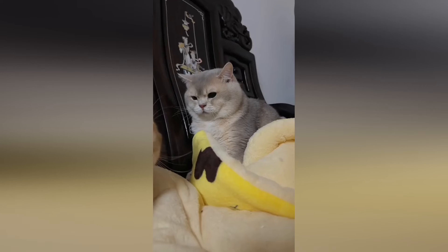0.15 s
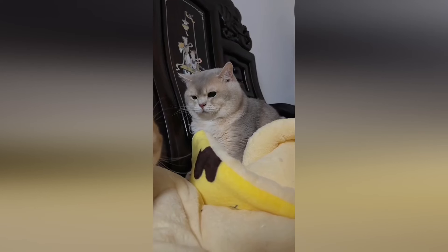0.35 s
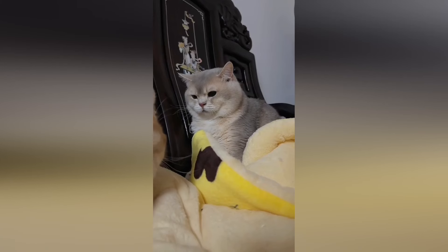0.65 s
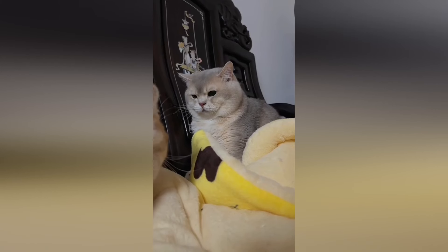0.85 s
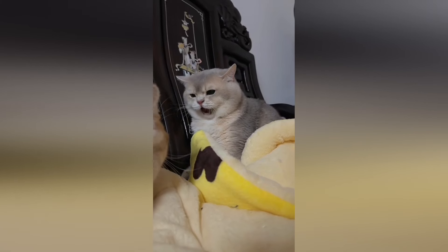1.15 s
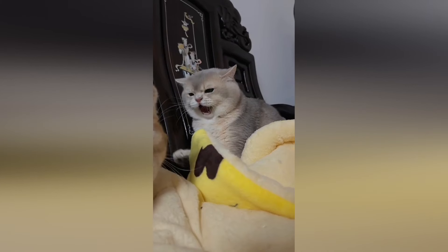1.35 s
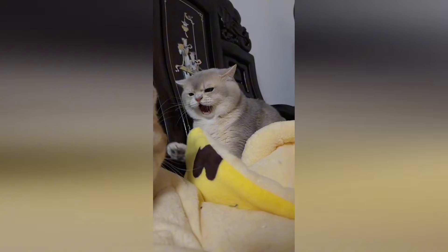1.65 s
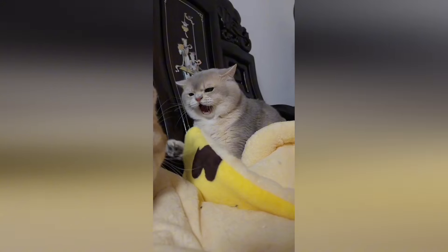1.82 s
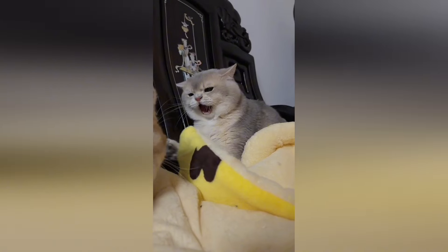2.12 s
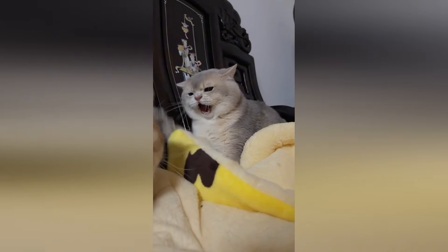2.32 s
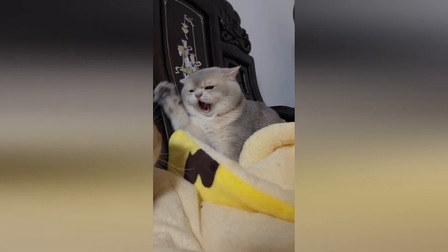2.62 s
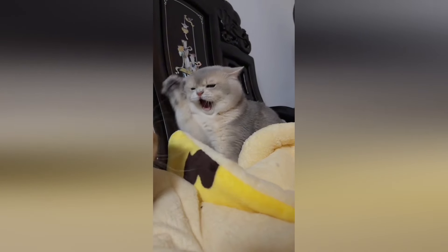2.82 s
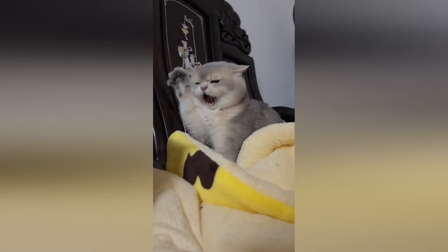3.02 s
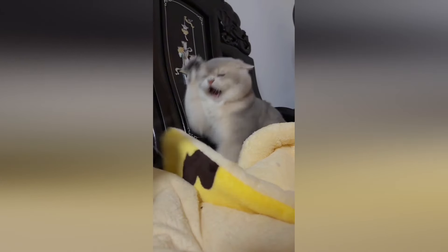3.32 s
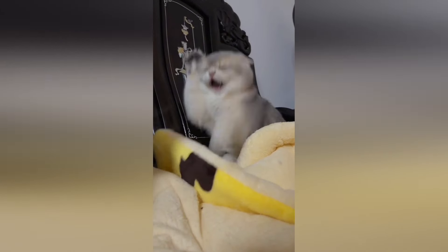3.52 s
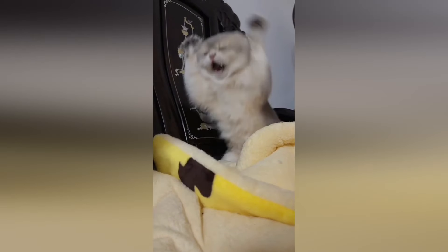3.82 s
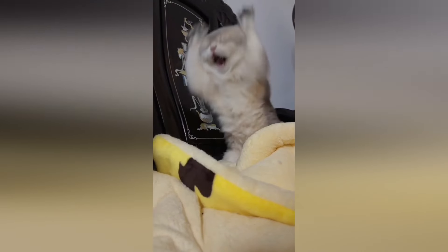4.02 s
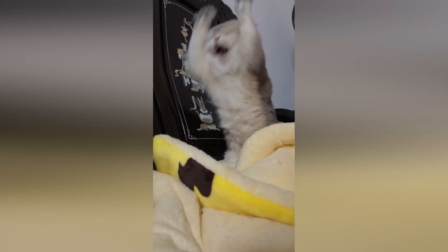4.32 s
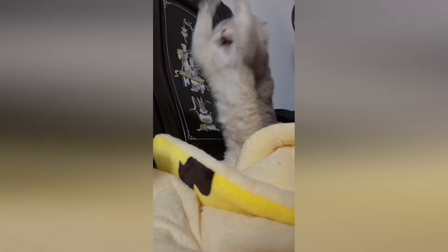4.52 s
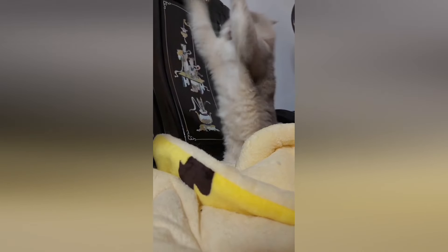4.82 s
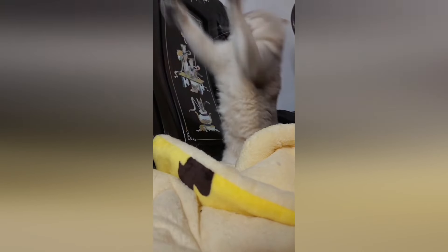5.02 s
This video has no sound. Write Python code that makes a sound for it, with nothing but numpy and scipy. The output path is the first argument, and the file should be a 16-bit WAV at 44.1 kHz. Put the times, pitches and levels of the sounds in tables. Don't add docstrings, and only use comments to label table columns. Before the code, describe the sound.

Close indoor phone capture of a cat humming low, then yowling long and hoarse, with faint whining from another cat and bedding bumps.

```python
import sys
import numpy as np
from scipy import signal
from scipy.fft import rfft, irfft, next_fast_len
from scipy.io import wavfile
from scipy.ndimage import uniform_filter1d

SR = 44100
rng = np.random.default_rng(int(sys.argv[2]) if len(sys.argv) > 2 else 0)


def inscribe(sig):
    pcm = np.round(np.clip(np.atleast_2d(sig).T, -1, 1) * 32767)
    wavfile.write(sys.argv[1], SR, pcm.astype(np.int16))


def level_to_linear(level):
    exponent = np.asarray(level, float) / 20
    return 10 ** exponent


N = 227195
T = np.arange(N) / SR
OPPOSITE = np.array([[1], [-1]])

# t/s, f/Hz
PITCH = [
    [(0.0, 375.4), (0.09, 388.7), (0.2, 348.6), (0.45, 300.5), (0.52, 313.3), (0.6, 270.8), (0.82, 223.9),
     (0.97, 228.8), (1.06, 289.8), (1.1, 312.8), (1.14, 338.7)],
    [(1.14, 384.4), (1.17, 441), (1.21, 465.2), (1.25, 502.4), (1.28, 519.7), (1.5, 530.6), (1.75, 506.9),
     (1.8, 505.7), (1.84, 495.4), (1.864, 501.6), (1.876, 516), (1.976, 522.2), (2.03, 523.3), (2.2, 537.8),
     (2.33, 548), (2.36, 562.3), (2.47, 574), (2.55, 593.4), (2.63, 616.5), (2.67, 619), (2.7, 642),
     (2.82, 661.8), (2.97, 650.5)],
    [(2.91, 739), (2.93, 754), (3.0, 768.2), (3.16, 788.5), (3.27, 779), (3.36, 778), (3.43, 712.6)],
    [(3.4, 749.8), (3.44, 701), (3.57, 681.8), (3.63, 810.5)],
    [(3.55, 705.4), (3.62, 790.6), (3.81, 787.6), (4.06, 791), (4.14, 823.4), (4.32, 800.6), (4.5, 791.2),
     (4.68, 824), (4.76, 724)],
    [(4.72, 514.3), (4.76, 497.7), (4.82, 500.2), (4.85, 484.5), (4.91, 470.7), (4.96, 486.7),
     (5.07, 489.4), (5.1, 470), (5.15, 452)],
]
# t/s, level/dB
EFFORT = [(0.0, -28), (0.17, -21.5), (0.62, -21.5), (0.72, -29.5), (0.87, -20), (1.26, -25.5), (1.3, -19.5),
          (1.95, -22.5), (2.54, -20.5), (4.37, -20), (4.47, -15), (4.63, -21), (4.68, -19), (4.75, -24.5),
          (4.85, -20.5), (5.02, -22.5), (5.12, -21), (5.15, -27.5)]
# t/s, jaw (0 shut, 1 open, 2 gaping, 3 half shut), pitch jitter/%, hoarseness (0-1)
FOLDS = [(0, 0, 0.19, 0.09), (1.025, 0, 0.97, 0), (1.04, 0.42, 0.6, 0.58), (1.13, 0.75, 0.781, 0.38),
         (1.19, 0.84, .5, 0.4), (1.3, 1, 0.64, 0.51), (2.8, 1.5, 0.56, 0.39), (2.94, 1.43, 1.21, 0.15),
         (3.05, 2, 0.3, 0.42), (3.33, 2, 0.42, 0.2), (3.42, 2.5, 0.81, 1.12), (3.58, 2.5, 0.73, 0),
         (3.68, 2.5, 0.34, 0.02), (3.95, 2.5, 0.37, 0.01), (4.25, 2.5, 0.47, 0.72), (4.44, 2.5, 0.6, 0.7),
         (4.52, 3, 0.61, 1.16), (4.7, 3, 1.27, 0.16), (4.85, 3, 0.49, 0.98), (5.15, 2.5, 0.71, 0.98)]
# start t/s, end t/s, cycles, level/dB
UNEVEN = [
    (3.442, 3.9, 2, -26),
    (4.07, 4.159, 3, -23),
    (4.2, 4.287, 3, -2.5),
    (4.32, 4.38, 3, -12.5),
    (4.7, 4.727, 2, -12.5),
    (4.648, 4.73, 3, -6),
]
UNEVEN_FADE_DB_S, UNEVEN_WAVER_DB = 99, 3
UPPER_SIDE_DB = -4.5
# centre t/s, half length/s, rate f/Hz, pitch swing/%, level/dB
FLUTTER = [(1.463, 0.041, 53.7, 1.6, 0.5), (1.849, .07, 59.9, 2.3, -1), (2.334, 0.083, 54.9, 1.2, 0.5),
           (2.551, 0.058, 60.7, 1.35, 1), (2.702, 0.051, 43.6, 1.9, 0), (3.428, 0.029, 91.5, 3.1, 0.5),
           (4.076, .06, 49, 1.76, -0.5), (4.576, 0.1, 48.4, 1.53, 2.5), (4.846, 0.02, 50, 1.1, -0.5),
           (5.004, 0.077, 70.8, 1.9, 0), (5.117, 0.023, 74, 1.6, -0.5)]
# t/s, length/s, level/dB
SURGES = [(0.077, 0.016, -7), (0.482, 0.015, -2), (0.776, 0.038, -1), (1.097, 0.057, -1),
          (1.322, 0.022, 3.5), (1.359, 0.028, -4), (1.397, 0.017, 2), (1.432, 0.013, -5), (1.47, 0.008, 2),
          (1.5, 0.038, -3.5), (1.637, 0.05, 2), (1.737, 0.043, 3.5), (2.11, 0.042, 2.5),
          (2.177, 0.031, -1.5), (2.598, 0.012, 2.5), (2.642, 0.0083, 2), (2.692, 0.017, -3),
          (2.708, .008, 0), (2.8, 0.023, -7), (2.832, 0.032, 4.5), (2.903, 0.018, 3.5),
          (3.007, 0.017, -2.5), (3.05, 0.026, 2.5), (3.089, 0.022, -5), (3.121, 0.02, 1),
          (3.139, 0.0055, -3.5), (3.215, 0.0064, 2), (3.22, 0.012, 1), (3.245, 0.013, -2.5),
          (3.285, 0.053, 3.5), (3.371, 0.0076, 8.5), (3.419, 0.0074, 6), (3.43, .006, -1.5),
          (3.657, 0.017, -3), (3.762, 0.048, -2), (3.822, 0.019, 1.5), (4.018, 0.02, -3),
          (4.154, 0.019, -0.5), (4.419, 0.0065, -6.5), (4.516, 0.0087, 5.5), (4.525, 0.012, -4),
          (4.669, 0.012, -0.5), (4.822, 0.012, -1.5), (4.831, 0.0089, -0.5), (4.855, 0.007, -1.5),
          (4.913, .012, 2.5), (4.939, 0.0094, -5), (4.955, 0.049, 2)]
# t/s, level/dB
WHEEZE = [(1.0, -0.5), (1.2, 4), (1.3, -3), (2.2, -3), (2.95, -4), (3.3, -5.5), (3.6, 1), (3.9, -3),
          (4.15, 3), (4.5, 1), (5.15, -1)]
BREATH_DB, GROWL_DB, WHEEZE_DB = (-58, -22), (-33.5, -12.5), (-6.5, -3)
GROWL_HZ, TREMOR_DB = 117.5, 1.5
BREAK_S = .03

# f/Hz, then level/dB with the jaw shut, open, gaping, half shut
TRACT = [(120, -45, -45, -37.5, -43), (210, -6, -7, -42.5, -72), (520, -1, -7, -27, 6.5),
         (701, 3, -22, -31.5, -17.5), (1045, -31, 4, -7, -14), (1290, -53, -13.5, -11.5, -5),
         (2457, -42, 4.5, 8, -3), (2554, -53, 7, -18.5, -6), (3055, -59.5, -21, -9.5, -3),
         (3690, -48.5, -21, -24, -27.5), (4050, -66.5, -18.5, -41.5, -26), (7530, -44, -49.5, -40, -38.5),
         (10970, -53, -29, -48, -18.5), (14400, -64, -47, -55, -37.5)]
# t/s, centre f/Hz, lift level/dB
TEETH = [(1.05, 4180, 8), (2.0, 4950, 2), (2.78, 5130, 13.5), (3.1, 4710, -8), (3.36, 5240, 24),
         (3.55, 5680, 18), (3.8, 5990, 12), (4.1, 5930, 19), (4.3, 5680, 16), (4.44, 5680, 27),
         (4.6, 5510, 32), (4.7, 5400, 18), (5.15, 5200, 17)]
# t/s, centre f/Hz, lift level/dB
PALATE = [(1.05, 2566, -6), (1.2, 2615, -15), (1.45, 2710, -11), (1.7, 2550, 5.5), (1.95, 2530, 9),
          (2.15, 2594, 16.5), (2.3, 2680, 3), (2.55, 2970, 0.5), (2.8, 3130, -6.5), (3.1, 3200, -5),
          (3.35, 3050, 10), (3.45, 2860, 15), (3.57, 2680, 13.5), (3.65, 3170, 4), (4.05, 3370, 2),
          (4.3, 3240, 9.5), (4.5, 2920, -11), (4.8, 3000, 2), (5.15, 2850, 13.5)]
# t/s, centre f/Hz, level/dB
POCKET = [(0.9, 4620, -7), (1.08, 4800, -23), (1.17, 4850, -22), (1.25, 4900, -3), (1.5, 4900, -3.5),
          (3.25, 4500, 3), (3.35, 4350, -8), (3.48, 4150, -14), (3.54, 4000, -2), (3.9, 4170, 10),
          (4.15, 4510, -11), (4.33, 4330, -3), (4.42, 3680, -6), (4.8, 3700, -7), (5.15, 3600, -9)]
# t/s, low f/Hz,
# high f/Hz, lift level/dB
OPENING = [(1.0, 754, 2330, -14), (1.05, 860, 2300, -2.5), (1.12, 1300, 2590, 27), (1.17, 1425, 2740, 17.5),
           (1.21, 1417, 1850, 7.5), (1.28, 1640, 2100, 14), (1.36, 1590, 2030, 6)]
TEETH_WIDTH_HZ, PALATE_WIDTH_HZ, POCKET_WIDTH_HZ, OPENING_WIDTH_HZ = 317, 150, 150, 224
# centre f/Hz, width f/Hz, level/dB
NOTCHES = [(1780, 300, -2.5), (2840, 57, -1.5), (3124, 88, 4.5), (3616, 71, -10.5), (6640, 160, -9.5),
           (7220, 55, 3), (7840, 66, -5), (11380, 1900, -16)]
EDGES_HZ = [60, 900, 1800, 3500, 6500, 15800]
# jaw, then level/dB of chest, throat, mouth, teeth, lips
SHARES = [(0, -1.5, -31.5, -43, -48, -58.5), (.6, 7.5, -4, -8.5, -28.5, -36),
          (1, -13.5, -4.5, 0.5, -27.5, -36), (1.5, -15, -11.5, 2, -20, -30.5),
          (2, -11.5, -16, 0.5, -24.5, -30), (2.5, -10.5, -9.5, -2, -19.5, -25.5),
          (3, -5.5, -2.5, -13, -22, -18.5)]
HOARSE_SHIFT_DB = [-11, 1, 2, 3, -5.5]
DRIFT_DB = [1.73, 2.5, 1, 1.2, 0.9]
# t/s, then level/dB of chest, throat, mouth, lips, left minus right
BALANCE = [(0, 0, 2.5, -4, 1, 7), (1.0, -2, -2, 4, -6, 0), (1.12, -3, 2, -4, 2.5, 0),
           (1.24, 2.5, 4, -5.5, 0.5, 1.5), (1.5, 8, -2.5, 0.5, 0, 3), (1.75, -2.5, 0.5, -1, 1, -1.5),
           (2.0, 2, -1.5, -2, 0, 2.5), (2.3, -2.5, 2, 1, -1, 2), (2.5, 7, 6, -0.5, -2.5, 2),
           (2.6, -3.5, 0, 0, -0.5, 2), (2.7, 3, -5.5, -2.5, 0.5, 0.5), (2.95, 0.5, -3, 1, -0.5, 2.5),
           (3.08, -1, 7.5, 1, -0.5, 3.5), (3.2, 4, -5.5, 0.5, -1, 2), (3.4, -1.5, -1.5, -2, -1.5, 2.5),
           (3.55, -8, -6, 0, -4.5, 2), (3.75, -1.5, 2, 4.5, 5.5, -1), (4.0, 2.5, 0.5, 0, -1, 0),
           (4.22, 4, 1, -2.5, 1.5, 3), (4.33, 1.5, -0.5, -3, 3, 3), (4.48, -20, -0.5, 0, -3.5, -2),
           (4.55, -6, -0.5, 0, -6, 1), (4.67, -3.5, 0.5, -1.5, -1.5, 2), (4.8, -12.5, 4.5, -0.5, 3, -1),
           (5.0, -0.5, -1, -6.5, 2.5, 1), (5.15, 3.5, 4, -2, 5, 1)]
PATCHY_DB, LOPSIDED_DB = 4.5, 4.5
# t/s, length/s, centre f/Hz, width f/Hz, level/dB
LIFTS = [
    (1.05, .045, 6130, 548, 7),
    (2.57, 0.075, 9700, 1000, 14),
    (3.78, 0.12, 8030, 900, 9),
    (3.7, 0.076, 7200, 500, 6),
    (4.95, 0.086, 6400, 410, 0),
    (3.21, .2, 1180, 200, 11.5),
    (4.44, 0.09, 4270, 870, 6.5),
    (3.15, 0.18, 11000, 1300, 7),
    (1.35, 0.11, 7000, 900, 4.5),
]

# t/s, f/Hz, level/dB
WHINES = [
    [(0.0, 522, -47.5), (0.052, 527.7, -51.5), (0.156, 515.2, -49), (0.394, 507.7, -46.5),
     (0.402, 534, -46), (0.434, 507, -92), (0.44, 498, -76)],
    [(0.44, 417, -64), (0.444, 395, -50), (0.518, 428, -45), (0.674, 422.4, -47.5), (0.774, 392, -78),
     (0.8, 392.3, -66)],
]
# multiple of the pitch, level/dB
WHINE_ORDERS = [(1, -12), (2, -16.5), (3, -9.5), (4, -17), (5, -21), (6, -21.5)]
ROOM_T60_S, ROOM_TREBLE_T60_S, ROOM_DB = .35, .4, -5

# f/Hz, level/dB
HISS = [(530, -7.5), (900, 0), (1320, -11), (3500, -16.5), (4390, -21), (8860, -19.5), (11100, -29.5),
        (11900, -35), (15500, -43.5)]
HISS_DB = -67
# t/s, length/s, thud level/dB, rustle level/dB
HANDLING = [(0.01, 0.11, -62, -51), (0.48, 1, -50, -54), (1.089, 0.58, -48, -50), (1.422, 0.16, -46.5, -72),
            (2.014, 0.16, -61, -47.5), (2.14, 0.28, -38.5, -54), (2.553, 0.73, -48.5, -56),
            (2.828, 0.79, -51, -56), (3.15, 0.75, -59, -59.5), (3.377, 0.37, -42.5, -61),
            (3.537, 0.47, -44, -54), (3.796, 0.29, -48, -42.5), (4.186, 0.51, -53, -41),
            (4.393, 0.42, -51, -32), (4.8, 0.39, -60, -33.5), (5.04, 1, -47, -42)]
BUMP_FALL_DB = 35.5
STILL_THUD_DB, STILL_RUSTLE_DB = -65.5, -72
# t/s, length/s, level/dB
SHOVES = [
    (.2, .3, -59),
    (0.604, .2, -65),
    (2.137, 0.072, -42),
    (2.3, 0.056, -55),
    (3.0, 0.12, -67),
    (3.4, .1, -50),
    (3.607, 0.15, -50.5),
    (3.848, 0.092, -67),
]

# f/Hz, level/dB
MASK_DB = [(0, -45), (1200, -43), (2500, -30.5), (3800, -19), (5800, -10), (7200, -4), (16000, -3)]
# f/Hz, level/dB
COVER_DB = [(200, -67), (600, -59), (800, -60.5), (1300, -54.5), (1800, -62), (4000, -58), (6500, -62.5),
            (9000, -64.5), (12000, -68.5), (16000, -69.5)]
COVER_HZ, MUTE_DB = (900, 3500), -40
WIDE_TOP_HZ, WIDE_UNDER_DB = 6200, -58
# t/s, fall/ms, hold/ms, rise/ms, depth level/dB
DROPOUTS = [
    (1.2886, 0.5, 0.82, 13, -15),
    (3.386, 15, 12, 2.5, -4.5),
    (3.795, 5.5, 2.6, 3.3, -16.5),
]
DROPOUT_TOP_HZ = 3800
LIMIT = 2.5


def columns(table, t=T):
    s, *rest = np.transpose(table)
    return [np.interp(t, s, c) for c in rest]


def level(x, db):
    return x * level_to_linear(db) / np.sqrt(np.mean(x ** 2))


def band(x, lo_hz, hi_hz):
    return signal.sosfilt(signal.butter(3, [lo_hz, hi_hz], "bandpass", fs=SR, output="sos"), x)


def walk(rate_hz):
    smooth = signal.butter(2, rate_hz, fs=SR, output="sos")
    return level(signal.sosfilt(smooth, rng.standard_normal(N)), 0)


def flutter():
    pitch_shake, shake_db = 0, 0
    for s, length, hz, pitch, db in FLUTTER:
        swell = np.exp(-((T - s) / length) ** 4)
        turn = 2 * np.pi * hz * (T - s)
        pitch_shake = pitch_shake + pitch / 100 * swell * np.sin(turn)
        shake_db = shake_db + db * swell * np.cos(turn)
    return pitch_shake, shake_db


def turbulence(breath_db, wheeze_db):
    noise = rng.standard_normal(N)
    breath = level_to_linear(breath_db) * (.15 * noise + .85 * band(noise, 1400, 3300))
    at_teeth = level_to_linear(columns(WHEEZE)[0]) * band(noise, 3200, 6500)
    return breath + at_teeth + level_to_linear(wheeze_db) * 1.5 * band(noise, 6500, 17000)


def uneven_strength(cycles):
    strength = 0
    for start, end, every, db in UNEVEN:
        if round(every) == cycles:
            outside_s = np.maximum(np.maximum(start - T, T - end), 0)
            strength = strength + level_to_linear(db - UNEVEN_FADE_DB_S * outside_s)
    return strength


def folds(shake):
    _, jitter, hoarse = columns(FOLDS)
    breath_db, growl_db, wheeze_db = (clear + (rough - clear) * hoarse
                                      for clear, rough in (BREATH_DB, GROWL_DB, WHEEZE_DB))
    wobble = 1 + jitter / 100 * (.8 * walk(15) + .95 * walk(50) + .45 * walk(200)) + shake
    growl = np.cos(2 * np.pi * np.cumsum(GROWL_HZ * (1 + 0.1187 * walk(11.2))) / SR)
    noise = turbulence(breath_db, wheeze_db)
    spells = [(cycles, uneven_strength(cycles)) for cycles in (2, 3)]
    slip, waver = .5 * walk(25), level_to_linear(UNEVEN_WAVER_DB * walk(18))
    out = np.zeros(N)
    for rows in PITCH:
        start, end = rows[0][0], rows[-1][0]
        on = slice(max(int((start - BREAK_S) * SR), 0), int((end + BREAK_S) * SR))
        t = T[on]
        hz = columns(rows, t)[0] * wobble[on]
        phase = 2 * np.pi * np.cumsum(hz) / SR
        partials = range(1, min(31, int(16500 / hz.min()) + 1))
        pulses = sum(np.cos(k * phase + .15 * k * k) * np.clip((16500 - k * hz) / 500, 0, 1)
                     for k in partials)
        turns = sum(g[on] * waver[on] * np.exp(1j * (phase / n + slip[on])) for n, g in spells)
        uneven = turns.conj() + level_to_linear(UPPER_SIDE_DB) * turns + 2 * level_to_linear(growl_db[on]) * growl[on]
        spinning = signal.hilbert(pulses, next_fast_len(len(t)))[:len(t)]
        rough = band((spinning * uneven).real, 1200, 6500)
        breath = noise[on] * (1 + .5 * np.cos(phase)) * np.sqrt(SR / 4 / hz)
        since_start = t - start + (start == 0)
        until_end = end - t + (t[-1] == T[-1])
        fade = np.clip(.5 + np.minimum(since_start, until_end) / BREAK_S / 2, 0, 1)
        out[on] += fade * (pulses + rough + breath)
    return out * level_to_linear(TREMOR_DB * walk(12.9) + 0.9 * jitter * walk(46))


def room(x, wet_db, direct_db=0):
    t = T[:SR // 3]
    shared, noise = rng.standard_normal((2, len(t)))
    differing = 0.5 * band(noise, 710, 1860) + 0.5 * band(noise, 2670, 11000) + 0.89 * noise
    echoes = shared + differing * OPPOSITE
    echoes = echoes - .6 * band(echoes, 60, 800)
    low = signal.lfilter([.3], [1, -.7], echoes)
    treble = (echoes - low) * 0.026
    tail = low * level_to_linear(-60 * t / ROOM_T60_S) + treble * level_to_linear(-60 * t / ROOM_TREBLE_T60_S)
    tail = tail * np.clip(t / 0.0023 - 1, 0, 1)
    tail = tail * level_to_linear(wet_db) / np.sqrt(np.sum(tail ** 2) / 2)
    wet = signal.fftconvolve(x[None], tail, axes=1)[:, :N]
    return (level_to_linear(direct_db) * x + wet) / np.hypot(level_to_linear(direct_db), level_to_linear(wet_db))


def resonance(f, hz, width_hz, db):
    return db / (1 + ((f[:, None] - hz) / width_hz) ** 2)


def tract(f, t, jaw):
    shapes = columns([(np.log(hz), *db) for hz, *db in TRACT], np.log(f + 1))
    tract_db = sum(db[:, None] * np.clip(1 - abs(jaw - k), 0, 1) for k, db in enumerate(shapes))
    for table, width_hz in ((TEETH, TEETH_WIDTH_HZ), (PALATE, PALATE_WIDTH_HZ), (POCKET, POCKET_WIDTH_HZ)):
        hz, db = columns(table, t)
        tract_db = tract_db + resonance(f, hz, width_hz, db)
    for hz, width_hz, db in NOTCHES:
        tract_db = tract_db + resonance(f, hz, width_hz, db)
    low_hz, high_hz, mouth_db = columns(OPENING, t)
    for hz in (low_hz, high_hz):
        tract_db = tract_db + resonance(f, hz, OPENING_WIDTH_HZ, mouth_db)
    return tract_db


def treble_patches(f, shape):
    patches = rng.standard_normal(shape)
    for _ in range(2):
        patches = uniform_filter1d(uniform_filter1d(patches, size=4, axis=1), size=44, axis=2)
    both, lopsided = patches / patches.std() * np.clip(f[:, None] / 3000 - 1, 0, 1)
    return PATCHY_DB * both + LOPSIDED_DB * lopsided * OPPOSITE[..., None]


def cat():
    shake, shake_db = flutter()
    f, t, z = signal.stft(room(folds(shake), ROOM_DB), SR, nperseg=1024, noverlap=896)
    jaw, _, hoarse = columns(FOLDS, t)
    z = z * level_to_linear(tract(f, t, jaw) + treble_patches(f, z.shape))
    chest_db, throat_db, mouth_db, lips_db, pan_db = columns(BALANCE, t)
    z = z * level_to_linear(np.array([pan_db, -pan_db])[:, None] / 2)

    effort_db = columns(EFFORT, t)[0]
    for s, length, db in SURGES:
        effort_db = effort_db + db * np.exp(-((t - s) / length) ** 2)
    drift_db = np.array([db * np.interp(t, T, walk(6.26)) for db in DRIFT_DB])
    drift_db = drift_db + [chest_db, throat_db, mouth_db, lips_db / 2, lips_db]
    region_db = effort_db + columns(SHARES, jaw) + np.outer(HOARSE_SHIFT_DB, hoarse) + drift_db
    gain_db = np.full(z.shape[1:], -120.)
    for lo, hi, db in zip(EDGES_HZ, EDGES_HZ[1:], region_db):
        rows = (f >= lo) & (f < hi)
        power = (abs(z[:, rows].mean(axis=0)) ** 2).sum(axis=0) * 4 / 3
        gain_db[rows] = db - 10 * np.log10(uniform_filter1d(power, size=30) + 1e-12)
    for s, length, hz, width, db in LIFTS:
        in_band, in_time = np.exp(-((f - hz) / width) ** 2), np.exp(-((t - s) / length) ** 2)
        gain_db = gain_db + db * np.outer(in_band, in_time)
    z = z * level_to_linear(uniform_filter1d(gain_db, size=5, axis=0))
    return signal.istft(z, SR, nperseg=1024, noverlap=896)[1][:, :N] * level_to_linear(shake_db)


def other_cat():
    hz, db = columns(WHINES[0] + WHINES[1])
    phase = 2 * np.pi * np.cumsum(hz * (1 + 0.0046 * walk(29))) / SR
    fade = np.clip((WHINES[1][-1][0] - T) / .08, 0, 1)
    partials = sum(level_to_linear(g) * np.cos(k * phase) for k, g in WHINE_ORDERS)
    return np.sqrt(2) * level_to_linear(db) * fade * partials


def hiss():
    noise = rng.standard_normal((2, N))
    f = np.arange(N // 2 + 1) * SR / N
    colour = level_to_linear(columns([(np.log(hz), db) for hz, db in HISS], np.log(f + 1))[0])
    air = irfft(rfft(noise[0] + .5 * noise[1] * OPPOSITE) * colour, N)
    return air * level_to_linear(HISS_DB) / np.std(band(air, 3500, 15500)) * level_to_linear(1.2 * walk(14))


def handling():
    s, length, thud_db, rustle_db = np.transpose(HANDLING)[:, :, None]
    fall_db = BUMP_FALL_DB * abs(T - s) / length
    noise = rng.standard_normal((4, N))
    thud = level(band(noise[0] + .3 * noise[2] * OPPOSITE, 55, 110), 0)
    cloth = noise[1] + .25 * noise[3] * OPPOSITE
    rustle = level(band(cloth, 112.7, 241.3), 0)
    rustle = rustle + level(band(cloth, 178.0, 365), -6.0) + level(band(cloth, 355, 890), -10.5)
    thud_db = np.maximum((thud_db - fall_db).max(axis=0), STILL_THUD_DB)
    rustle_db = np.maximum((rustle_db - fall_db).max(axis=0), STILL_RUSTLE_DB)
    return thud * level_to_linear(thud_db) + rustle * level_to_linear(rustle_db + 0.28 * walk(33))


def shoves():
    db = np.max([db - BUMP_FALL_DB * ((T - s) / length) ** 2 / 3 for s, length, db in SHOVES], axis=0)
    swings = np.array([[1, .25], [1, -.25]]) @ rng.standard_normal((2, N))
    return level(band(swings, 33, 48), 0) * level_to_linear(np.maximum(db, -72))


def scene():
    duck = level_to_linear(-6 * np.clip(columns(FOLDS)[0], 0, 1))
    return cat() + room(other_cat(), 2.1) + handling() + shoves() + duck * hiss()


def mute_weak(x):
    f, _, z = signal.stft(x, SR, nperseg=1024, noverlap=768)
    power = uniform_filter1d((abs(z[:, 1:]) ** 2).sum(axis=0), size=9, axis=1) + 1e-16
    bands = power.reshape(256, 2, -1).mean(axis=1)
    around = uniform_filter1d(bands, size=33, axis=0)
    middle = power[(f[1:] > COVER_HZ[0]) & (f[1:] < COVER_HZ[1])].sum(axis=0)
    under_around_db = columns(MASK_DB, f[1::2])[0][:, None] - 10 * np.log10(bands / around)
    under_middle_db = columns(COVER_DB, f[1::2])[0][:, None] - 10 * np.log10(bands / middle)
    under_db = np.maximum(under_around_db, under_middle_db)
    z[:, 1:] *= np.repeat(level_to_linear(MUTE_DB * np.clip(under_db / 2, 0, 1)), 2, axis=0)
    side = (z[0, 1:] - z[1, 1:]) / 2
    wide = (abs(side) ** 2).reshape(128, 4, -1).sum(axis=1)
    wide = uniform_filter1d(wide, size=5, axis=1) + 1e-16
    wide_db = 10 * np.log10(wide / power.sum(axis=0))
    faint = (f[2::4, None] > WIDE_TOP_HZ) & (wide_db < WIDE_UNDER_DB)
    z[:, 1:] -= side * np.repeat(faint, 4, axis=0) * OPPOSITE[..., None]
    return signal.istft(z, SR, nperseg=1024, noverlap=768)[1][:, :N]


def low_pass(x):
    return signal.sosfilt(signal.butter(12, 15780, fs=SR, output="sos"), x)


def record(dry):
    gain_db = 0
    for s, fall_ms, hold_ms, rise_ms, depth_db in DROPOUTS:
        after_ms = (T - s) * 1000
        falling, rising = 1 + after_ms / fall_ms, 1 - (after_ms - hold_ms) / rise_ms
        gain_db = gain_db + depth_db * np.clip(np.where(T < s, falling, rising), 0, 1)
    x = LIMIT * np.tanh(dry / LIMIT)
    highpass = signal.butter(3, DROPOUT_TOP_HZ, "highpass", fs=SR, output="sos")
    spared = signal.sosfiltfilt(highpass, x) * (T > 2)
    mix = mute_weak((x - spared) * level_to_linear(gain_db) + spared)
    return low_pass(mix)


dry = scene()
out = record(dry)
inscribe(out)
```